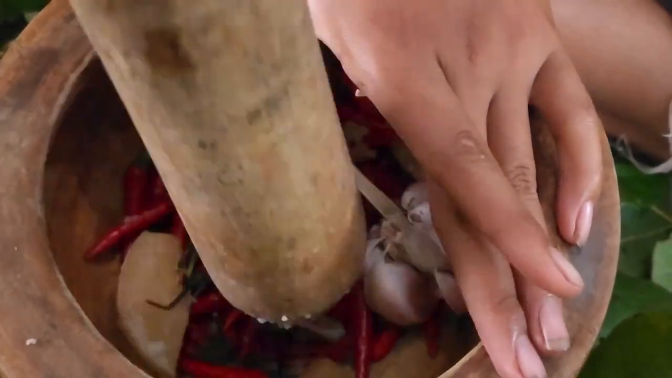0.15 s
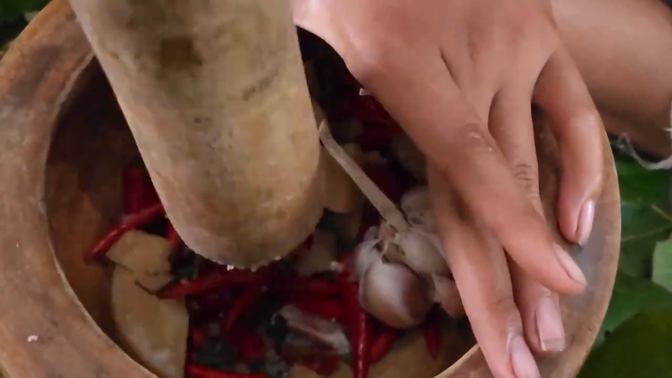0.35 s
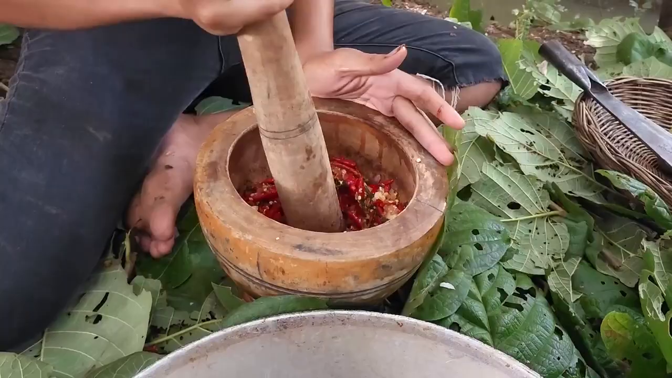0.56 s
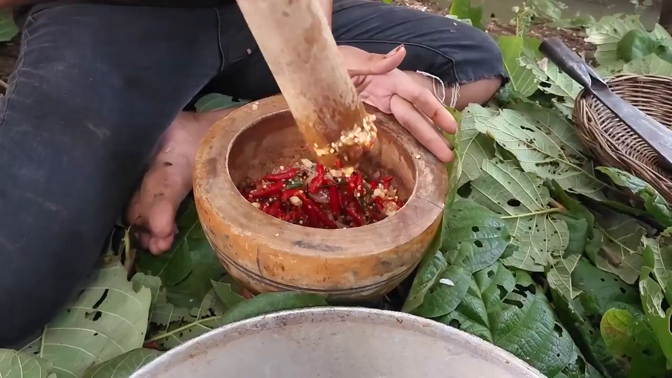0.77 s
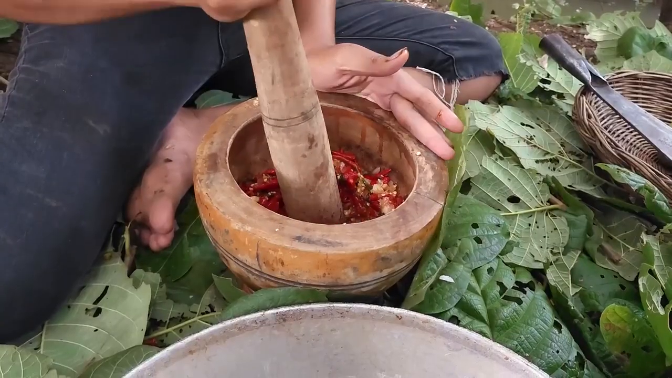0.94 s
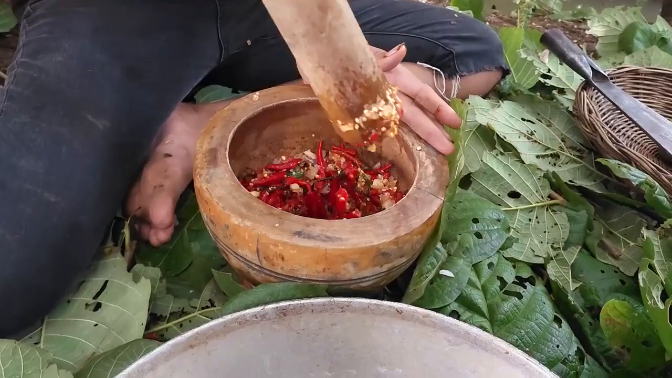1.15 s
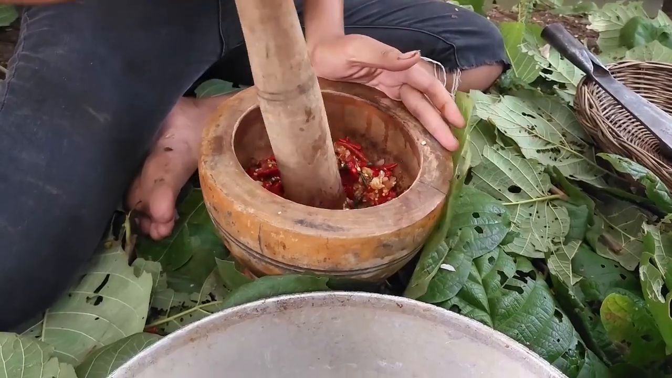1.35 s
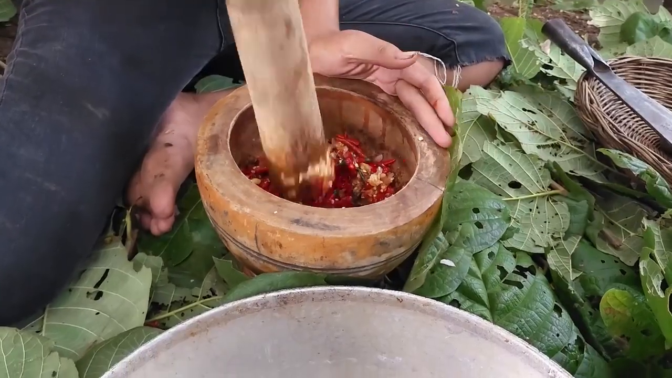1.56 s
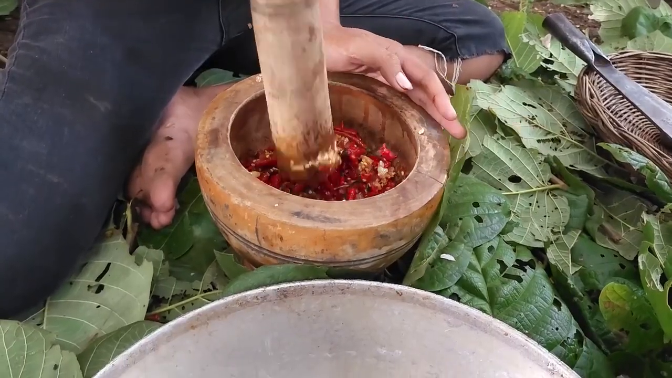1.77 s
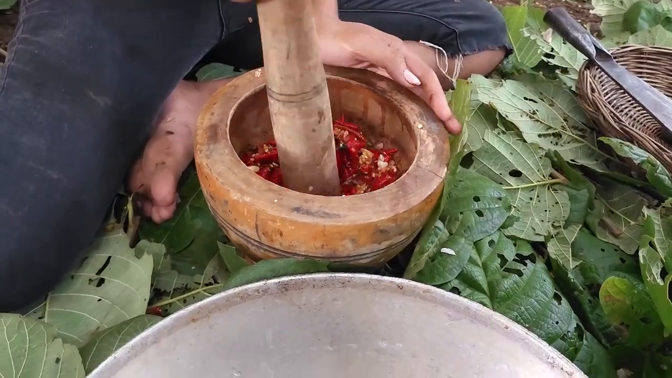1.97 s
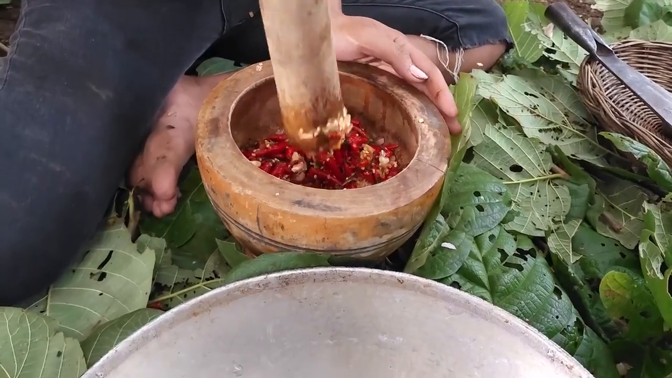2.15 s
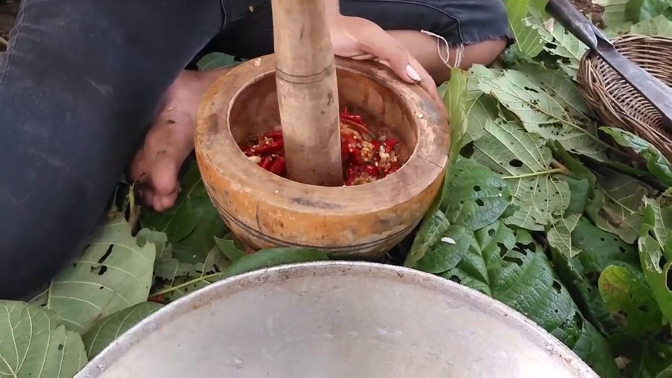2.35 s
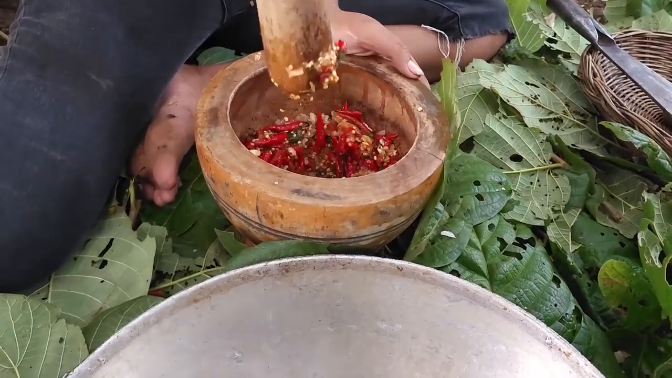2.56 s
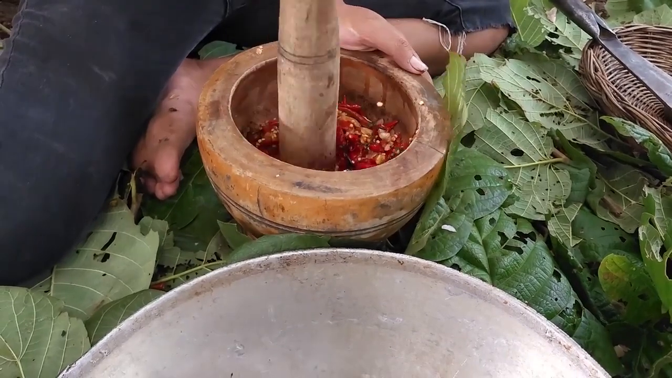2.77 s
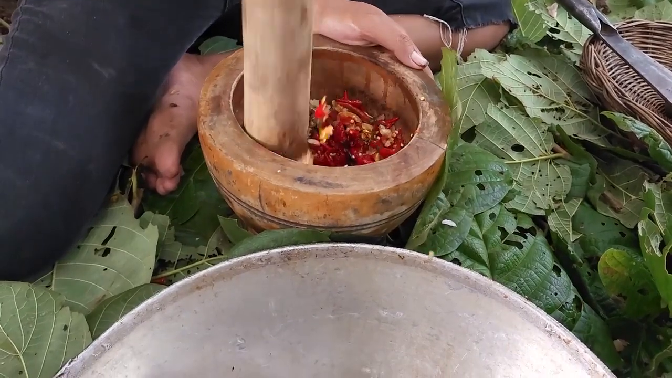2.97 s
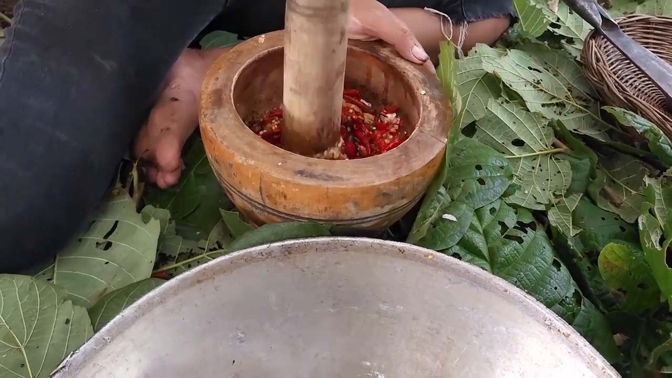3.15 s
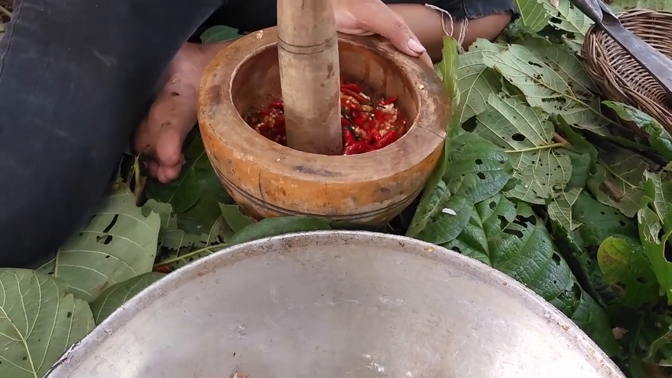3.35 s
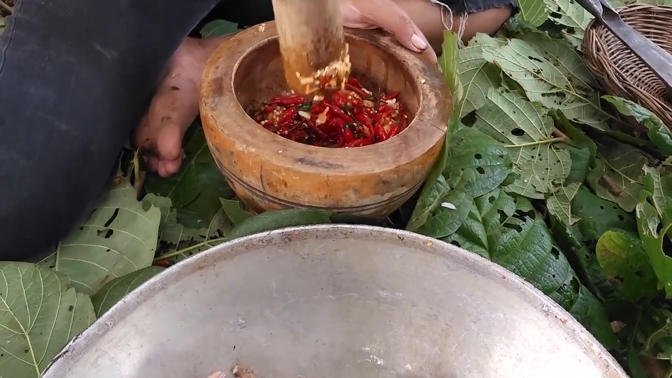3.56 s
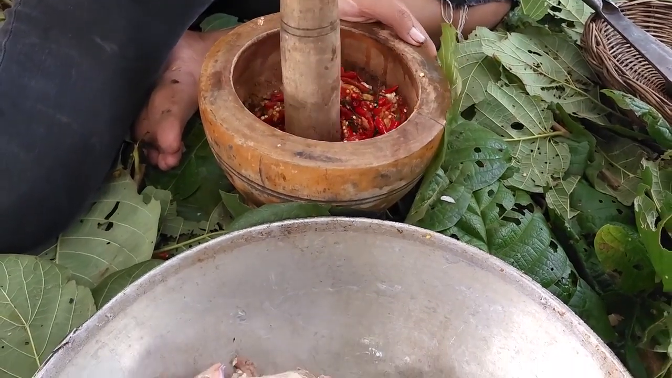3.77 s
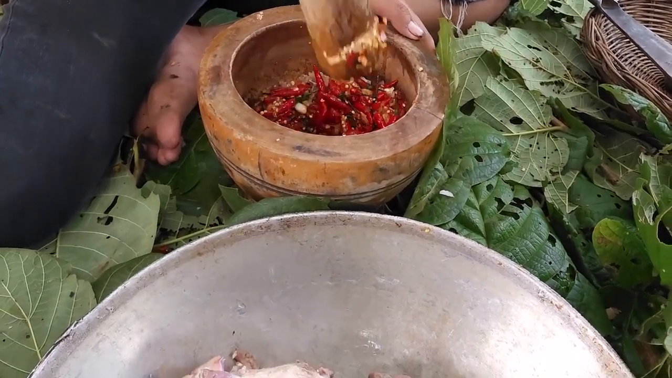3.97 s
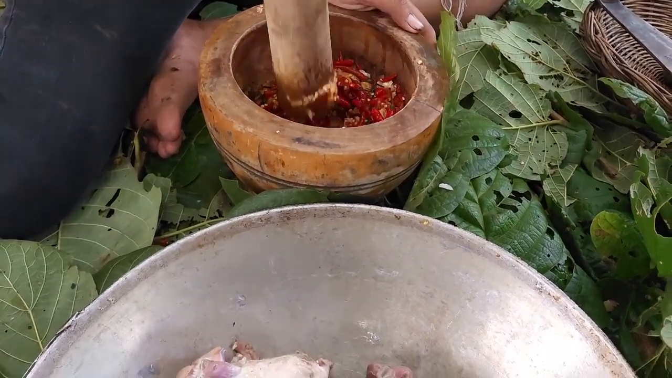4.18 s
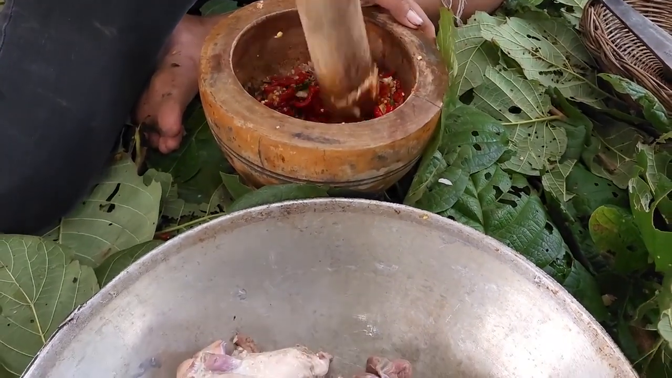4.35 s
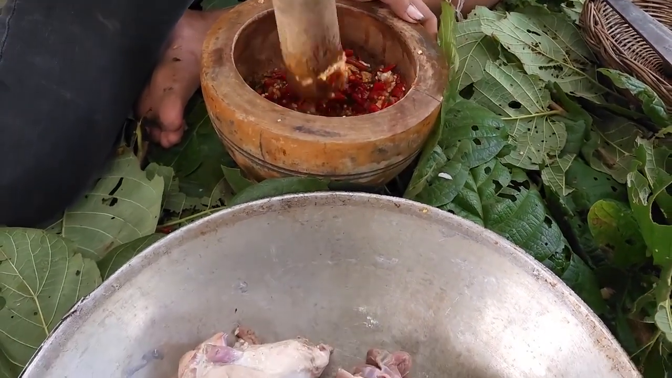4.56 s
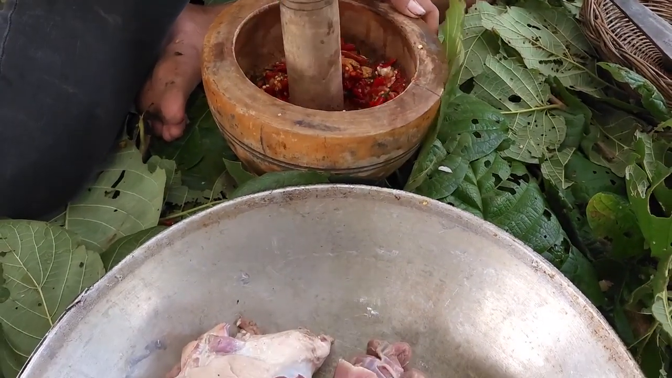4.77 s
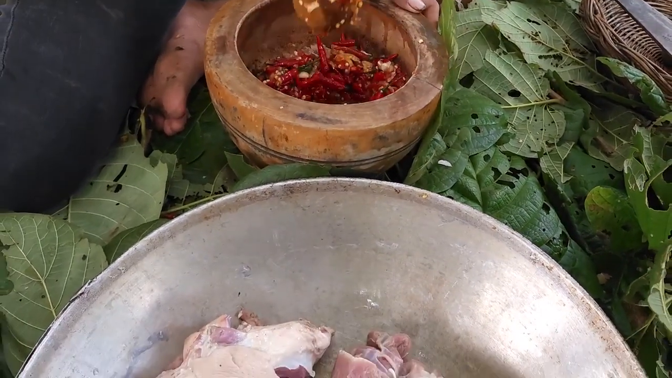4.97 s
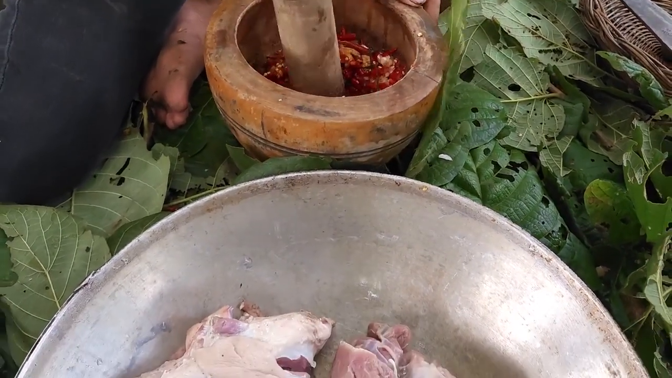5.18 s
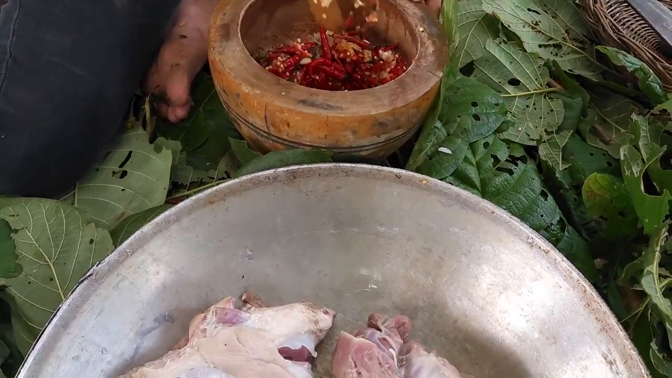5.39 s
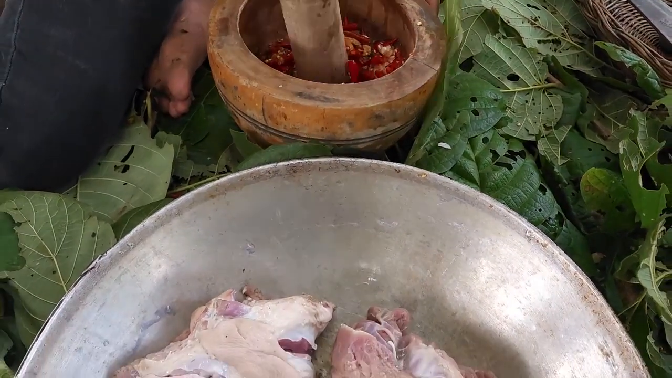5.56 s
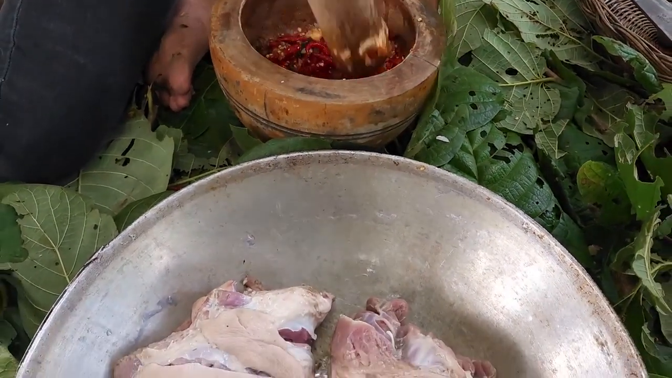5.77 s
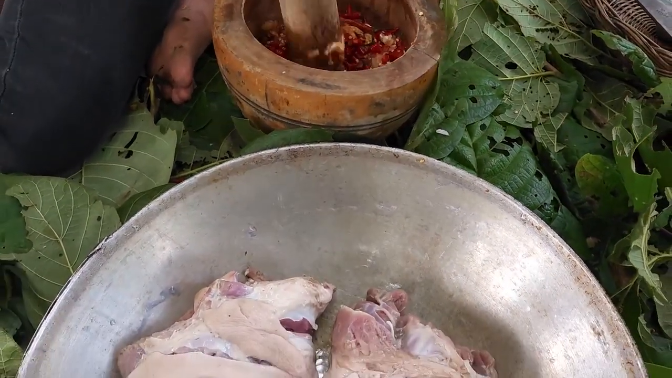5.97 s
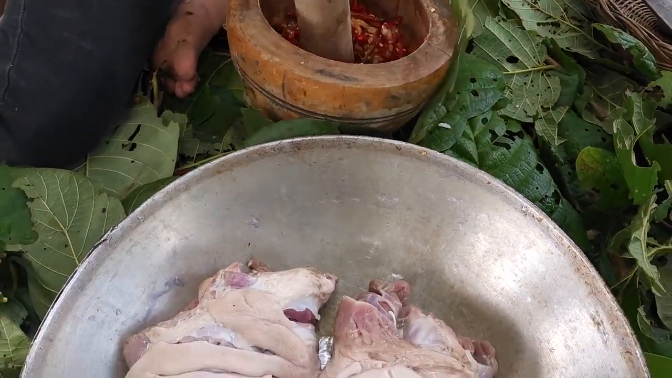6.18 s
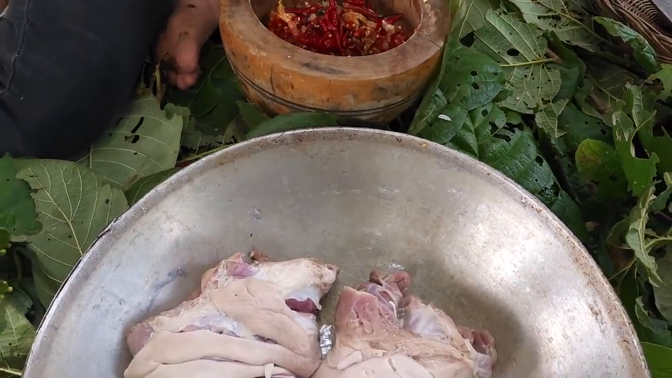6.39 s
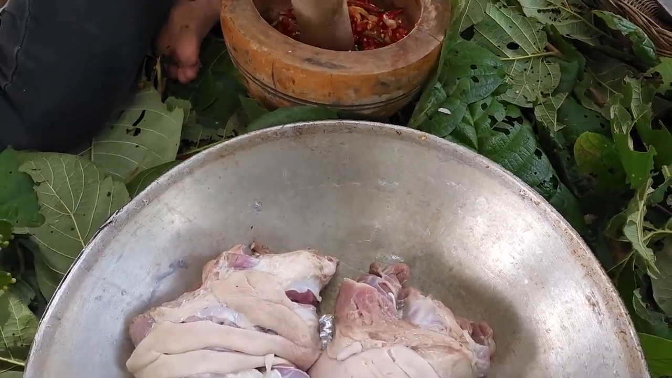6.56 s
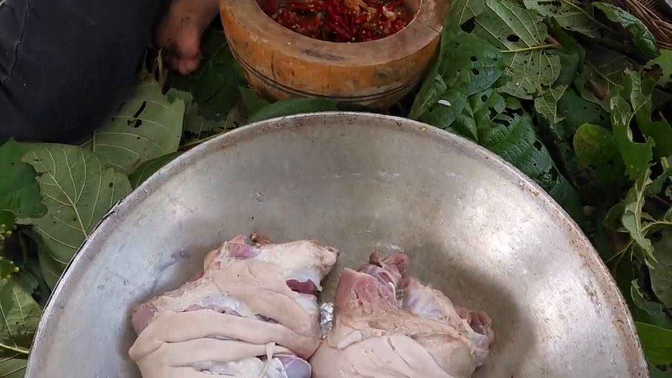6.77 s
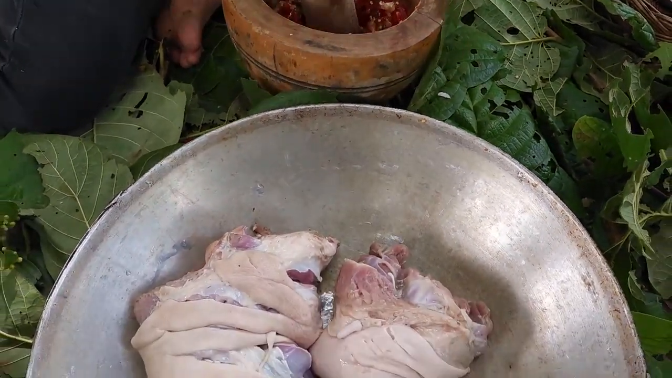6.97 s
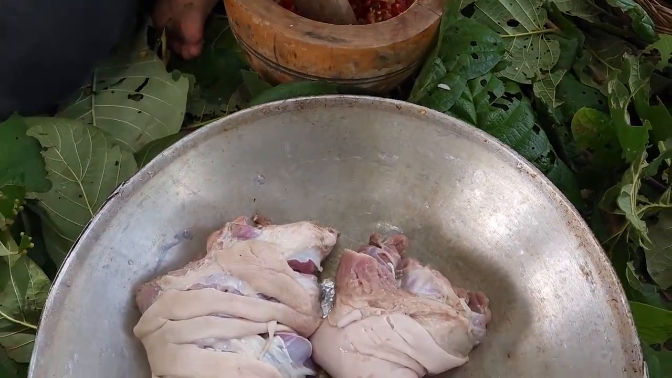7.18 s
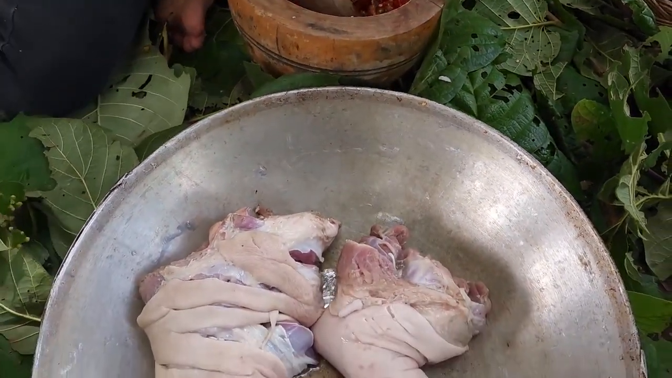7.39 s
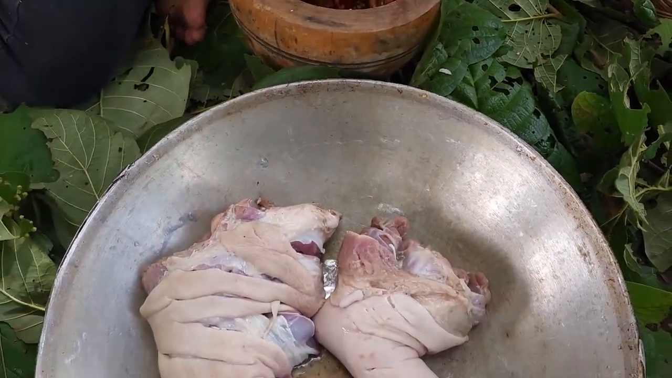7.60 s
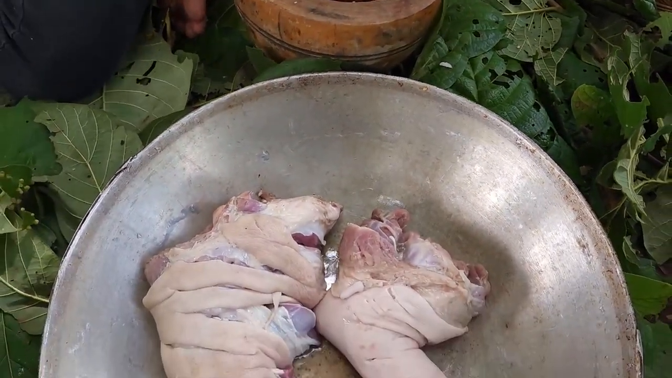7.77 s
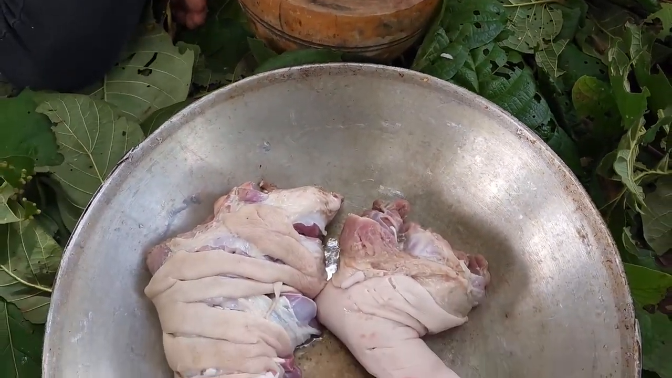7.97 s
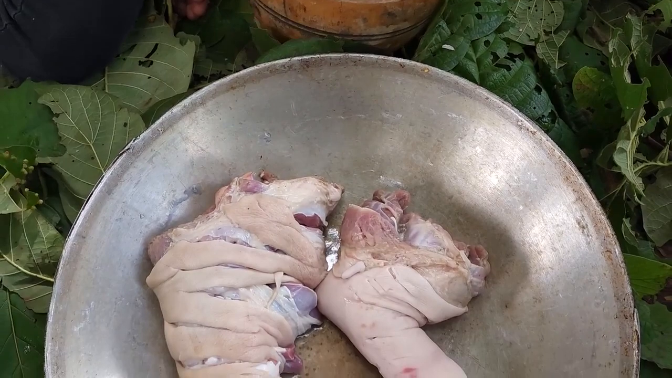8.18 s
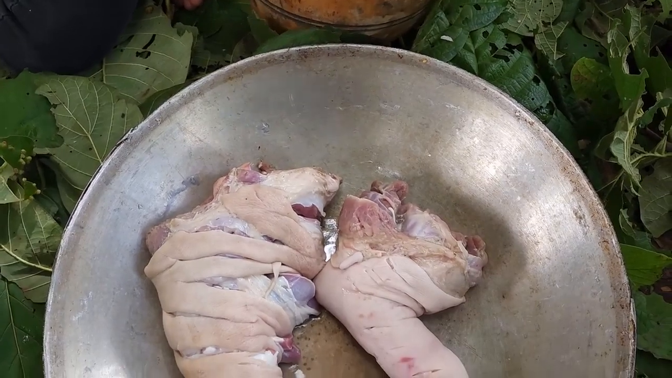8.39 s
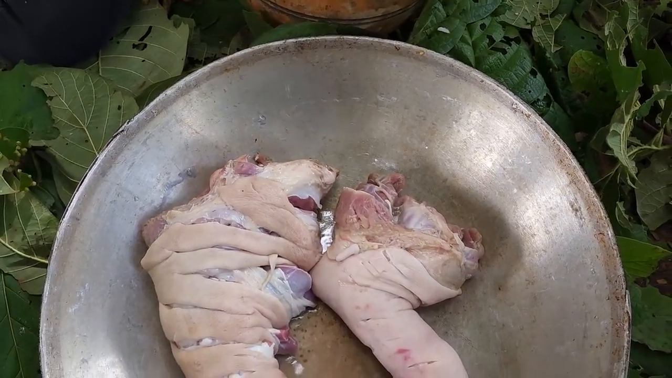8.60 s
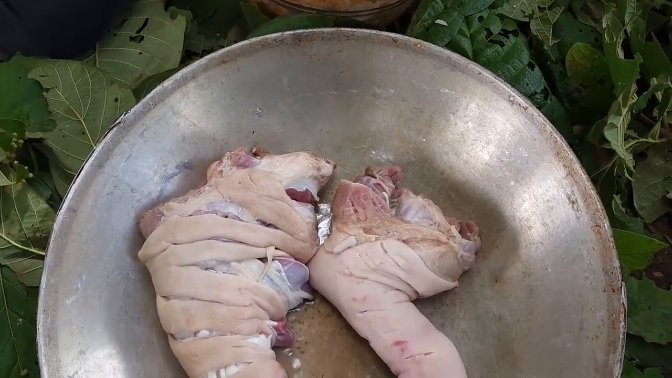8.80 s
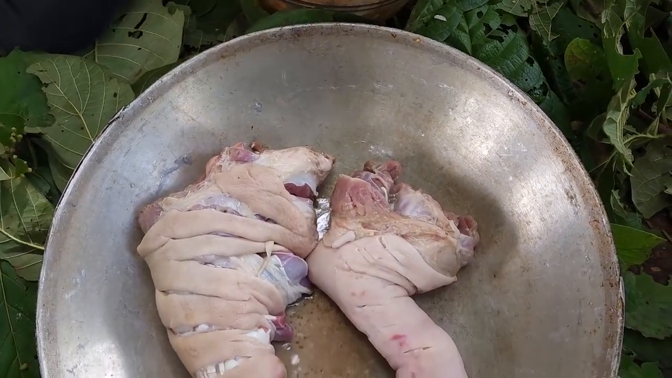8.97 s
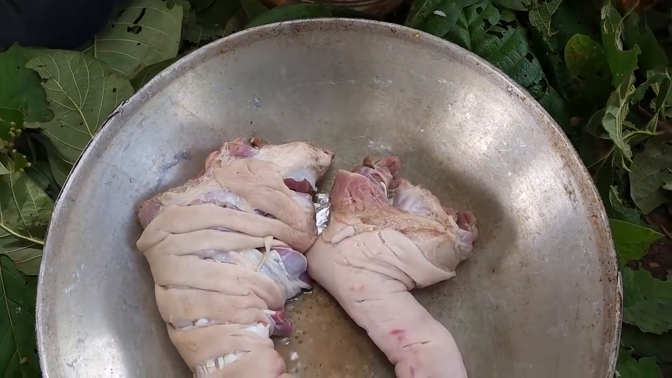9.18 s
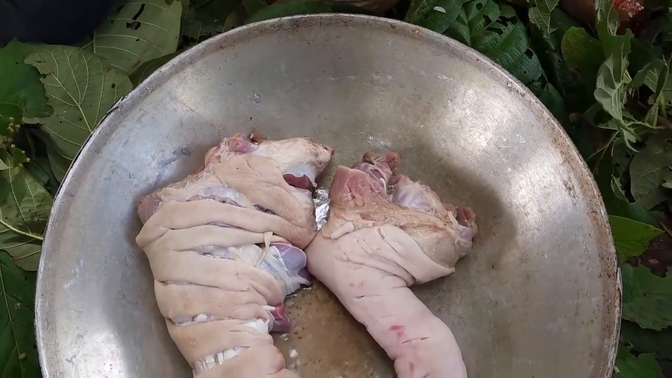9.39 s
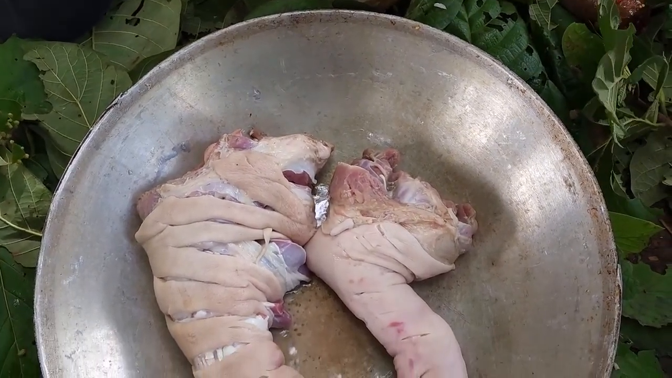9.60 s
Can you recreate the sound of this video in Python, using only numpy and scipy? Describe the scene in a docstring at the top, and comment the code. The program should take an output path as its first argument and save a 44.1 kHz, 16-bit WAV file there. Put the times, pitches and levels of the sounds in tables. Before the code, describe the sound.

A wooden pestle pounds chilies and garlic in a wooden mortar outdoors, about three crunchy strokes a second, ending in three bare wooden knocks.

```python
"""Chilies and garlic crunch under a wooden pestle in a wooden mortar on the ground, about three strokes a second.
Grain noise makes the crunch and the small wet squelch of each lift; decaying modes make wood knocks and ground thumps.
Three bare taps follow with scrapes, chatter and a short bright tail; bursts of fine crackle are rustling leaves.
Wavering harmonics over a rumble drone as a distant engine, with shaped noise for air, insects and an opening hiss.
A close pair of microphones hears it all with small delays, level differences and weak reflections."""
import sys
import numpy as np
from scipy import signal
from scipy.fft import rfft, irfft, next_fast_len
from scipy.io import wavfile

SR = 44100
rng = np.random.default_rng(int(sys.argv[2]) if len(sys.argv) > 2 else 0)


def to_wav(sig):
    """Store sig (one row per channel, or 1-D mono) as 16-bit WAV at the path in sys.argv[1].

    Samples outside -1..1 are clipped; the rate is SR.
    """
    pcm = np.clip(np.atleast_2d(sig), -1, 1) * 32767
    pcm = np.round(pcm).astype(np.int16)
    wavfile.write(sys.argv[1], SR, pcm.T)  # frames by channels


N = 425119
T = np.arange(N) / SR  # time [s]

# strokes into the pulp: (landing time [s], time spent sinking through the pulp [s], crunch level [dB],
# force [dB], mortar ring level [dB], ground level [dB], squelch level [dB])
STROKES = [ (0.21, .001, -26, -6.5, -37, -11.5, -58), (0.551, .001, -21.5, -9, -21.5, -12.5, -58),
           (.905, .02, -29.5, -26, -24, -43.5, -50.5), (1.245, .001, -23, -27, -12, -32, -55.5),
           (1.601, .004, -32, -54.5, -22.5, -35.5, -49), (1.975, 0.0068, -24, -27.5, -18, -28.5, -43.5),
           (2.335, .015, -26.5, -47, -17, -32.5, -49.5), (2.675, .011, -26.5, -39.5, -25, -36.5, -53.5),
           (3.021, .021, -28.5, -37, -36, -34, -47.5), (3.356, .003, -24, -29.5, -21, -25.5, -47),
           (3.704, 0.0026, -23.5, -26.5, -15, -20, -52.5), (4.047, .009, -30, -41, -22, -30.5, -52),
           (4.402, 0.011, -29, -29, -24, -27.5, -56.5), (4.754, .003, -24, -13, -8, -26, -55),
           (5.125, 0.016, -32.5, -34.5, -24.5, -30.5, -56.5), (5.491, .024, -33, -41, -16.5, -39.5, -51.5),
           (5.826, .007, -24, -22, -11, -29, -54.5), (6.185, .022, -27.5, -40, -16, -29, -51),
           (6.510, .019, -32, -46, -36, -41, -53), (6.841, 0.0022, -25.5, -40, -47, -31, -62)]
# taps on bare wood: (time [s], mortar ring level [dB], rebound share [ratio], scrape level [dB])
TAPS = [(8.042, -4.5, 0.29, -24.5), (8.2401, -4, 0.22, -47), (8.433, -3, 0.085, -46)]
# light touches while the pestle is handled: (time [s], crack level [dB], mortar ring level [dB])
TOUCHES = [(6.995, -32.5, -40.5), (7.131, -59, -38.5), (7.243, -52, -41.5), (7.409, -50, -55.5),
           (7.545, -47, -46.5), (8.098, -37.5, -40)]
# resonances of the bowl around the pulp: (frequency [Hz], width of one filter pass [Hz], level [dB])
BOWL_RESONANCES = [(620, 195, 5), (1050, 160, -8.5), (1403, 400, 0), (1665, 500, -7.5), (2370, 640, -8)]
# spectrum of the crack of contact: (frequency [Hz], relative level [dB])
CRACK_SPECTRUM = [(150, -10), (350, 0.5), (1800, -1.5), (2800, -11), (3500, 1.5), (4300, -8), (6000, -7),
                  (7500, -15), (10000, -21), (16000, -24)]

# the first strokes are heard from close by
CLOSE_UNTIL_S, CLOSE_FADE_S = 0.711, 0.055
FILLED_PITCH = 1.03  # pulp tunes the mortar a little higher


def undb(db):
    """Decibels to gain."""
    return np.exp(np.asarray(db) * np.log(10) / 20)


def unit(x):
    """Scale to an rms of one."""
    return x / np.sqrt(np.mean(x ** 2))


def add(out, start_s, x):
    """Mix x into out from the given time."""
    i = int(start_s * SR)
    out[i:i + len(x)] += x[:N - i]


def colour(x, points):
    """Filter by a (frequency [Hz], level [dB]) spectrum without shifting time, then scale to an rms of one."""
    hz, db = np.transpose(points)
    bins_hz = np.maximum(np.fft.rfftfreq(2048, 1 / SR), 1)
    gain = undb(np.interp(np.log(bins_hz), np.log(hz), db))
    response = np.fft.fftshift(irfft(gain))
    return unit(signal.oaconvolve(x, response * np.hanning(len(response)), "same"))


def resonate(x, peaks):
    """Parallel resonances, each applied twice for dark valleys between them; rms of one."""
    out = 0
    for hz, width_hz, db in peaks:
        section = np.concatenate(signal.iirpeak(hz, hz / width_hz, fs=SR))
        out = out + undb(db) * signal.sosfilt([section, section], x)
    return unit(out)


def walk(rate_hz):
    """A random wander with a spread near one, drawn to a new value at the given rate."""
    knots = rng.standard_normal(N // 100)
    return np.interp(T * rate_hz, np.arange(len(knots)), knots)


def grains(spread_db):
    """Dense tiny ruptures, a few much larger than the rest."""
    size_db = spread_db * np.minimum(rng.standard_exponential(N), 4)
    return rng.standard_normal(N) * undb(size_db)


def bursts(rows):
    """Envelope of (peak s, dB, rise s, fall s) bursts, 20 dB per rise or fall time; their powers add."""
    power = np.zeros(N)
    for s, db, rise_s, fall_s in rows:
        span = slice(max(int((s - 3 * rise_s) * SR), 0), int((s + 3 * fall_s) * SR))
        t = T[span] - s
        drop_db = 20 * np.maximum(-t / rise_s, t / fall_s)
        power[span] += undb(db - drop_db) ** 2
    return np.sqrt(power)


def ring(modes, pitch=1):
    """Decaying sine modes after one blow, each a little stronger or weaker by where it lands."""
    t = T[:SR // 8]
    out = 0
    for hz, db, t60 in modes:
        decay = np.exp(-np.log(1000) * t / t60)
        out = out + undb(db + rng.normal()) * np.sin(2 * np.pi * hz * pitch * t) * decay
    return out


def delay(x, seconds):
    """Delay x by a fixed or moving time."""
    return np.interp(T - seconds, T, x)


def airy(points, width=.7):
    """Noise of the given spectrum, partly unrelated left and right."""
    mid, side = (colour(rng.standard_normal(N), points) for _ in range(2))
    return mid + width * side * np.array([[1], [-1]])


def closeness():
    """One while the microphones are close to the bowl, then fading to zero."""
    return np.clip((CLOSE_UNTIL_S - T) / CLOSE_FADE_S, 0, 1)


def crunch(spread_db=3.5, crackle_db=0, bite_bowl_db=-3, squeeze_bowl_db=4.5, sag_db=-28, uneven_db=1.96):
    """Skins and seeds burst in a crackle that rings the bowl, and the pulp fizzes on; gives direct and scattered."""
    # crackle of the pulp: (frequency [Hz], relative level [dB])
    crackle_spectrum = [(150, -19), (300, 1), (450, 0), (900, -5.5), (2000, -1), (2650, -3.5), (3100, 3.5),
                        (4500, -1.5), (7500, -1), (9700, -8), (15000, -4), (16500, -15)]
    # first bite: a soft stroke or a deep heap takes longer to stop (times per 20 dB)
    bite_rise_s, bite_fall_s, soft_slowing, fall_per_sink = 0.0062, 0.016, 0.16, .55
    # last squeeze on the bottom: level at 0 dB force, dB per dB of force
    squeeze_db, squeeze_growth = -22.5, 0.22
    squeeze_lag_s, squeeze_rise_s, squeeze_fall_s = .002, 0.0073, 0.014
    rise_per_sink = .4  # a deeper heap builds up the squeeze more slowly
    fizz_fall_s = .12  # per 20 dB
    close_bowl_db = -5  # heard from close by, the first strokes carry less ring of the bowl

    bites, squeezes = [], []
    for s, sink_s, crunch_db, force_db, *_ in STROKES:
        fall_s = bite_fall_s * undb(-soft_slowing * force_db) + fall_per_sink * sink_s
        bites.append((s - sink_s, crunch_db, bite_rise_s, fall_s))
        level_db = squeeze_db + squeeze_growth * force_db
        rise_s = squeeze_rise_s + rise_per_sink * sink_s
        squeezes.append((s + squeeze_lag_s, level_db, rise_s, squeeze_fall_s))
    bite, squeeze = bursts(bites), bursts(squeezes)
    fizz = bursts([(s + fall_s, db + sag_db, fall_s, fizz_fall_s) for s, db, _, fall_s in bites + squeezes])

    hollow = np.hypot(undb(bite_bowl_db) * bite, undb(squeeze_bowl_db) * squeeze)
    hollow = hollow * undb(close_bowl_db * closeness())
    # pieces give way one after another, a few milliseconds apart
    size = np.sqrt(bite ** 2 + squeeze ** 2 + fizz ** 2) * undb(crackle_db + uneven_db * walk(300))
    direct, scattered = (size * colour(grains(spread_db), crackle_spectrum) for _ in range(2))
    return direct + hollow * resonate(grains(spread_db), BOWL_RESONANCES), scattered


def blows(push_s=.0033, sink_s=.0055, rock_db=4, soil_hz=400, crack_rise_s=0.001, crack_fall_s=0.0076):
    """The pestle lands with a crack: the bowl is shoved down and rocks on the soil."""
    # modes of the ground under the mortar: (frequency [Hz], level [dB], 60 dB decay time [s])
    ground_modes = [(71, 0, .085), (48, -18.5, 0.05), (112, -8.5, .055), (160, -11.5, .05),
                    (329.4, -13, 0.047)]
    crack_db, crack_growth = -12, 0.52  # level at 0 dB force, dB per dB of force
    tap_crack_db, tap_push_db, tap_ground_db = -16.5, -43, -35.5  # relative to the mortar ring
    touch_push_db = 1.5  # relative to the crack
    push_hz, close_push_hz = 280, 205  # whole cloves cushion the first strokes: a deeper push

    # each contact: (s, crack dB, push dB, ground dB)
    contacts = []
    for s, _, _, force_db, _, ground_db, _ in STROKES:
        contacts.append((s, crack_db + crack_growth * force_db, force_db, ground_db))
    for s, db, *_ in TAPS:
        contacts.append((s, db + tap_crack_db, db + tap_push_db, db + tap_ground_db))
    for s, db, _ in TOUCHES:
        contacts.append((s, db, db + touch_push_db, -np.inf))  # no ground thump

    push, ground = np.zeros((2, N))
    t = T[:SR // 20]
    for s, _, push_db, ground_db in contacts:
        hz = close_push_hz if s < CLOSE_UNTIL_S else push_hz
        add(push, s, undb(push_db) * np.sin(2 * np.pi * hz * t) * np.exp(-t / push_s))
        add(ground, s + sink_s, -undb(ground_db + rock_db) * ring(ground_modes))
    crack_size = bursts([(s + crack_rise_s, db, crack_rise_s, crack_fall_s) for s, db, *_ in contacts])
    crack = crack_size * colour(rng.standard_normal(N), CRACK_SPECTRUM)
    # soil passes no treble
    soil = signal.butter(2, soil_hz, fs=SR, output="sos")
    return crack + push + signal.sosfilt(soil, ground)


def knocks(rebound_s=.0160, radiate_hz=440, contact_hz=2400):
    """The mortar's modes ring at every stroke, touch and tap, with the pestle's under strokes and taps."""
    # modes of the mortar: (frequency when empty [Hz], level [dB], 60 dB decay time [s])
    mortar_modes = [(590, 0, .035), (636, -10.5, .026), (775, -18.5, .018), (1026.6, -14, 0.041),
                    (1414, -17, 0.038), (1640, -14.5, 0.035), (1860, -16.5, .022), (2150, -21.5, .015),
                    (3580, -18.5, 0.03)]
    # modes of the pestle: (frequency [Hz], level [dB], 60 dB decay time [s])
    pestle_modes = [(488, -4, .06), (1130, -18, 0.032), (1417, 1.5, .026), (1590, -5.5, .022)]
    held_pestle_db, tap_pestle_db = -20.5, -28.5  # the hand damps the pestle: relative to the mortar
    glance_s, glance_db = 1.245, -5.5  # one stroke glances off the wall and sets the pestle ringing

    wood = np.zeros(N)
    for s, _, _, _, db, *_ in STROKES:
        knock = ring(mortar_modes, FILLED_PITCH) + undb(held_pestle_db) * ring(pestle_modes)
        add(wood, s, undb(db) * knock)
    for s, _, db in TOUCHES:
        add(wood, s, undb(db) * ring(mortar_modes, FILLED_PITCH))
    add(wood, glance_s, undb(glance_db) * ring(pestle_modes))
    for s, db, rebound, *_ in TAPS:
        knock = undb(db) * (ring(mortar_modes) + undb(tap_pestle_db) * ring(pestle_modes))
        # on bare wood the pestle chatters, weaker at each touch
        for k in range(3):
            add(wood, s + k * rebound_s, knock * rebound ** k)
    # a small bowl radiates little bass and the contact time softens its top
    band = signal.butter(3, [radiate_hz, contact_hz], "band", fs=SR, output="sos")
    return signal.sosfilt(band, wood)


def squelches(rise_s=0.025, spread_db=5.5, spit_db=0, bowl_db=-7):
    """Sticky pulp tears in small wet clicks as the pestle lifts; part of their sound rings the bowl."""
    # wet clicks: (frequency [Hz], relative level [dB])
    wet_spectrum = [(200, -16.5), (550, -1), (900, -2.5), (1500, -0.5), (3200, -7.5), (5000, -12.5),
                    (8000, -15), (16000, -17.5)]
    lift_s, lift_fall_s = .097, 0.064  # the pestle pulls free a moment after each landing
    size = bursts([(s + lift_s, db, rise_s, lift_fall_s) for s, *_, db in STROKES])
    # strands let go one after another
    tearing = unit(undb(4.5 * np.clip(walk(160), -2, 2)))
    clicks = grains(spread_db) * tearing
    hollow = undb(bowl_db) * resonate(clicks, BOWL_RESONANCES)
    return size * (hollow + undb(spit_db) * colour(clicks, wet_spectrum))


def scrapes(spread_db=2.0):
    """Wood slides on wood around each of the last taps, as a short burst of grainy noise."""
    # wood sliding on wood: (frequency [Hz], relative level [dB])
    scrape_spectrum = [(400, -24), (600, -8), (1000, -17.5), (1450, -1.5), (1900, -2.5), (2400, -10),
                       (2900, -30.5), (3600, -18), (6000, -26.5), (16000, -40.5)]
    lead_s, rise_s, fall_s = .005, .018, .042
    size = bursts([(s - lead_s, db, rise_s, fall_s) for s, *_, db in TAPS])
    return size * colour(grains(spread_db), scrape_spectrum)


def wall_echo(x, share=.55, echo_s=.00065, sway=.38):
    """The bowl's wall returns the sound; a wandering gap, as for a moving pestle, varies the colour."""
    gap_s = echo_s * np.exp(sway * walk(2))
    return (x + share * delay(x, gap_s)) / np.hypot(1, share)


def lobes(x, share=0.31, above_hz=900):
    """The bowl's upper modes radiate in lobes: a quarter-cycle shift, added to one microphone and taken from the other."""
    size = next_fast_len(N + SR // 10, real=True)
    ratio = (np.fft.rfftfreq(size, 1 / SR) / above_hz) ** 8
    return irfft(1j * share * ratio / (1 + ratio) * rfft(x, size), size)[:N]


def tap_tails():
    """The cracks of the bare taps scatter back from leaves nearby as a short bright tail."""
    level_db, rise_s, fall_s = -51.5, 0.022, 0.083  # level relative to the mortar ring
    size = bursts([(s + rise_s, db + level_db, rise_s / 2, fall_s) for s, db, *_ in TAPS])
    return size * airy(CRACK_SPECTRUM)


def yard(x, wet_db=-36, t60=.3, dull_hz=3500):
    """Weak scattered reflections from leaves and things nearby: decaying noise, different in each ear."""
    t = T[:SR // 2]
    tails = rng.standard_normal((2, len(t))) * np.exp(-np.log(1000) * t / t60) * np.minimum(t / .01, 1)
    band = signal.butter(1, [350, min(dull_hz, SR / 3)], "band", fs=SR, output="sos")
    tails = signal.sosfilt(band, tails)
    tails /= np.sqrt(np.sum(tails ** 2, axis=1, keepdims=True))
    return undb(wet_db) * signal.oaconvolve(x[None], tails, axes=1)[:, :N]


def rustles(spread_db=7, flutter_db=3):
    """Leaves rub in uneven little surges of fine crackle."""
    # leaves brushed beside the mortar: (time [s], level [dB], fall time per 20 dB [s])
    brushes = [(1.389, -59, .14), (7.16, -57, 0.65), (7.54, -62.5, 0.53), (9.181, -59, 0.14),
               (9.24, -59, 0.09)]
    # leaf crackle: (frequency [Hz], relative level [dB])
    leaf_spectrum = [(150, -9.5), (300, 1.5), (700, -1), (1700, -1), (3200, -3), (4500, -7), (6000, -10.5),
                     (10000, -14.5), (16000, -17)]
    rise_share = 0.59  # of the fall time
    size = bursts([(s, db, rise_share * fall_s, fall_s) for s, db, fall_s in brushes])
    size = size * undb(flutter_db * walk(40))
    common = colour(grains(spread_db), leaf_spectrum)
    ears = [common + 0.89 * colour(grains(spread_db), leaf_spectrum) for _ in range(2)]
    return size * np.array(ears)


def engine(lines_db=-3, wander=.015):
    """Low harmonics of a far engine waver over its rumble."""
    # engine speed: (time [s], firing rate before wander [Hz])
    firing_rate = [(0, 37), (1, 38.26), (2.7, 40.06), (3.6, 36), (4.5, 44.96), (5.4, 48), (6.5, 48.6),
                   (7.6, 48), (9.64, 39.8)]
    # rumble: (frequency [Hz], relative level [dB])
    rumble_spectrum = [(20, -16), (45, -4), (70, -3), (120, 1), (165, -5.5), (210, -19.5), (280, -28),
                       (500, -49.5)]
    hz = np.interp(T, *np.transpose(firing_rate)) * (1 + wander * walk(3))
    phase = 2 * np.pi * np.cumsum(hz) / SR
    lines = 0
    for k, db in enumerate([-15.5, 1.5, -1.5, -9], 1):
        lines = lines + undb(db + 2.2 * walk(4)) * np.sin(k * phase)
    rumble = colour(rng.standard_normal(N), rumble_spectrum)
    return unit(rumble + undb(lines_db) * unit(lines))


def surroundings(patchy_db=1.1):
    """Engine drone and moving air share one slowly changing level that dips after the taps; insects and hiss join."""
    # background before the trims below: (time [s], drone and air level [dB], insect level [dB])
    levels = [(0.0, -54.5, -79), (0.43, -52.5, -77), (0.78, -54, -79), (1.96, -52, -81), (2.6, -51.5, -73),
              (3.73, -51.5, -69.5), (5.05, -52.5, -68.5), (6.31, -51.5, -68.5), (7.33, -53, -68),
              (7.92, -52.5, -70), (8.21, -57, -77.5), (8.65, -61.5, -77), (9.64, -57.5, -75.5)]
    # noise spectra: (frequency [Hz], relative level [dB])
    air_spectrum = [(150, -10), (280, 1.5), (650, -3), (1000, -5), (2000, -4), (2700, -11), (3600, -5.5),
                    (6500, -9), (11000, -13), (15000, -17.5), (16500, -17)]
    insect_spectrum = [(6000, -40), (7800, -9.5), (8900, -1.5), (9700, -12.5), (10600, -7), (11800, -19),
                       (14000, -35.5)]
    hiss_spectrum = [(150, -14), (300, 9.5), (1000, -4.5), (2500, -3.5), (4500, 0), (6300, 3),
                     (8500, -12.5), (12000, -23), (16000, -13)]
    drone_db, air_db, insects_db = 1.5, -14, 1.5  # trims on the levels above
    hiss_db = -58.5  # soft hiss under the close strokes

    s, *columns = np.transpose(levels)
    low, insects = (undb(np.interp(T, s, column)) for column in columns)
    outdoors = low * (undb(drone_db) * engine() + undb(air_db + walk(5)) * airy(air_spectrum))
    hiss = closeness() * undb(hiss_db + patchy_db * walk(15.5)) * airy(hiss_spectrum)
    high = undb(insects_db) * insects * (1 - closeness()) * airy(insect_spectrum)
    return outdoors + high + hiss


def scene(scatter=.48, tilt_db=.6, lag_s=.000092, lag_sway=0.33):
    """The mortar stands a little to the left, so it reaches the right microphone slightly later."""
    pulp, scattered = crunch()
    # the crunch comes back from the near wall and again from the far one
    pulp = wall_echo(wall_echo(pulp + squelches()), share=0.51, echo_s=.0013)
    wood = knocks() + blows() + scrapes()
    # the pulp of the close first strokes leans to the other side
    lean_db = tilt_db - 3 * closeness()
    side = lobes(wood)
    left = wood + side + undb(lean_db) * pulp
    # the lag wanders, as for a pestle landing in different parts of the bowl
    moving_lag_s = lag_s * np.exp(lag_sway * walk(3))
    right = delay(wood - side + undb(-lean_db) * pulp, moving_lag_s)
    mortar = np.array([left, right]) + scatter * wall_echo(scattered)
    return mortar + yard(pulp + wood) + tap_tails() + rustles() + surroundings()


def record(dry, ceiling=0.74):
    """The recorder drops the deepest bass, rounds the highest peaks and cuts the top."""
    top_hz = 15900
    low_cut = signal.butter(3, 30, "high", fs=SR, output="sos")
    rounded = ceiling * np.tanh(signal.sosfilt(low_cut, dry) / ceiling)
    return signal.sosfilt(signal.ellip(8, .2, 70, top_hz, fs=SR, output="sos"), rounded)


dry = scene()
out = record(dry)
to_wav(out)
```